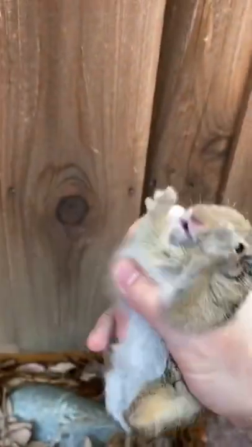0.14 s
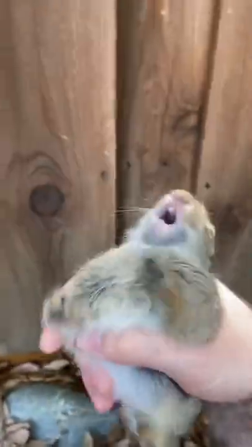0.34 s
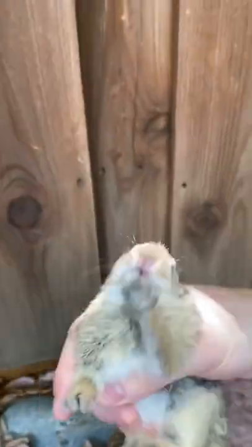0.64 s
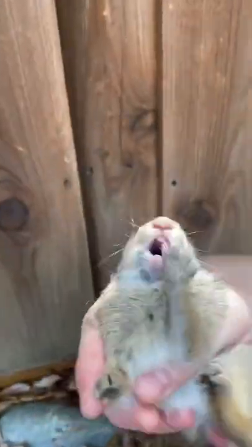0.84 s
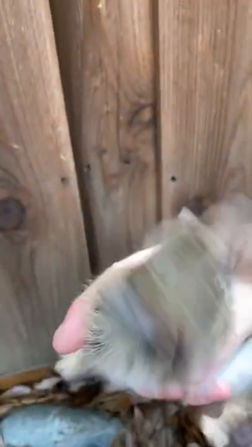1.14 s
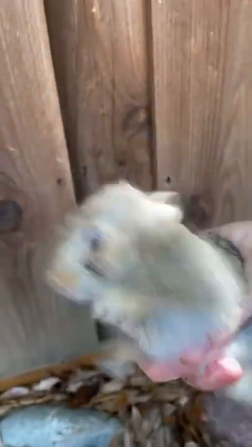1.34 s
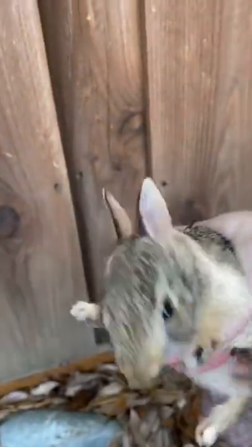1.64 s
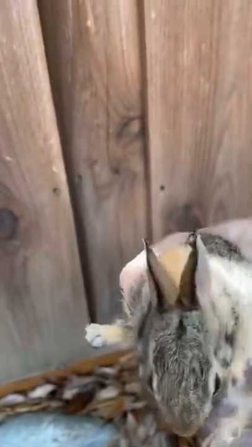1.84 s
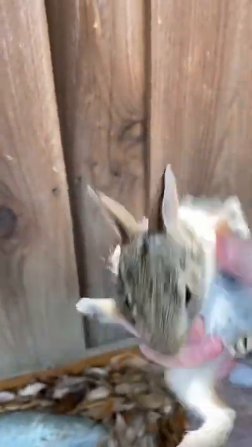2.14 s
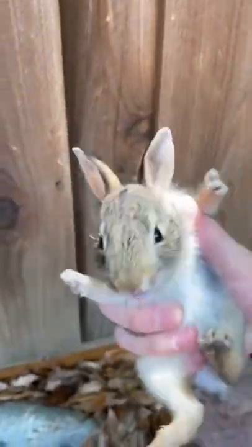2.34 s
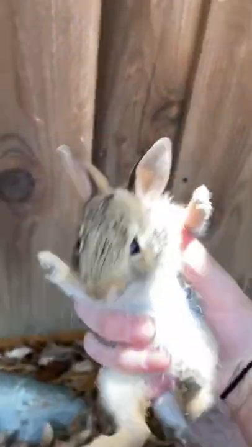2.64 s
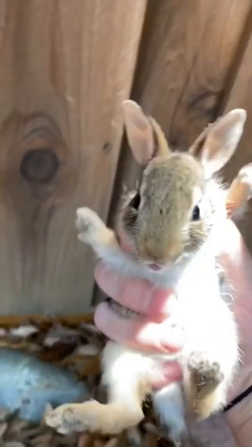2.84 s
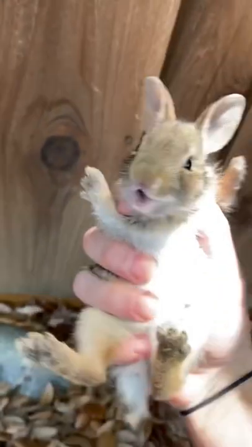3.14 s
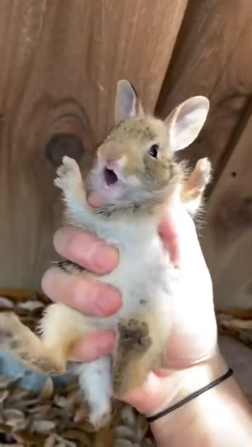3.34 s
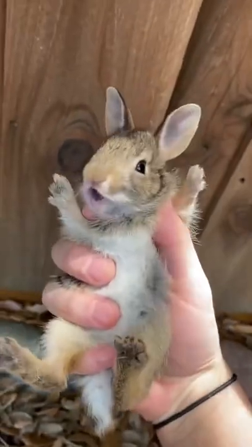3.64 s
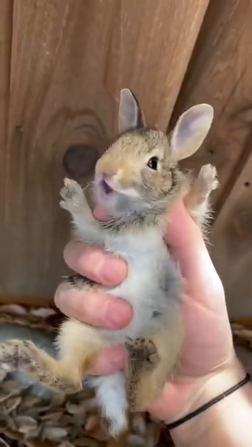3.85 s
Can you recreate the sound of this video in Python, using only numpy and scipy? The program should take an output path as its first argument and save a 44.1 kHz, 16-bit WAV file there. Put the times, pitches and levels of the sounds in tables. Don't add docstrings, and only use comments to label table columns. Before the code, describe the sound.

Piercing, raspy squeals from a small held rabbit repeat in short bursts over faint outdoor rumble.

```python
import sys
import numpy as np
from scipy import signal
from scipy.fft import rfft, irfft, next_fast_len
from scipy.io import wavfile
from scipy.ndimage import uniform_filter1d, map_coordinates

SR = 44100
rng = np.random.default_rng(int(sys.argv[2]) if len(sys.argv) > 2 else 0)


def volts(x):
    e = np.asarray(x, float) / 20
    return 10 ** e


def materialize(psi):
    bounded = np.clip(np.atleast_2d(psi).T, -1, 1)
    quanta = np.round(bounded * 32767).astype(np.int16)
    wavfile.write(sys.argv[1], SR, quanta)


N = 176400

# f/Hz, slope-free density level/dB
RUMBLE = [(15, -39), (25, -4.5), (75, 1), (127, -5.5), (189, -16), (374, -26.5), (884, -40.5), (1350, -37),
          (3000, -37.5), (3900, -75.5), (6600, -120)]
RUMBLE_DB, RUMBLE_SIDE_DB, SIDE_FULL_HZ, RUMBLE_RISE_DB_PER_S = -60, -7.5, 400, 0.2

# start t/s, length t/s, first f/Hz, last f/Hz, level/dB
COOS = [
    (0, 0.33, 412, 423, -73),
    (0.847, 0.16, 370, 370, -78),
    (3.02, 0.33, 400, 377, -72),
    (3.554, 0.16, 357, 336, -70.5),
]
COO_OCTAVE_DB = -24

# t/s, level/dB
KNOCKS = [
    (1.617, -47),
    (2.312, -46),
    (2.70, -59),
]
KNOCK_DECAY_S, RUB_TOP_HZ, THUMP_HZ = 0.0114, 251, 88.4

FENCE_S, FENCE_DB = .0035, -14
YARD_T60_S, YARD_DB, TAIL_T60_S, TAIL_DB, YARD_TOP_HZ = .06, -24, .4, -35, 5000

# t/s, f/Hz, effort level/dB, nose level/dB, mouth level/dB
STRUGGLING = [
    [(0.176, 1247, -63, 11, 16), (0.202, 1217, -34.5, -4, 6.5), (0.218, 1128, -39, -9, 5),
     (0.288, 973, -33.5, -19, -4), (0.356, 984.5, -25, -30, -1.5), (0.388, 993, -20.5, -32, -5),
     (0.416, 1033, -23, -28, -6.5), (0.454, 856.5, -28.5, -24.5, -8.5), (0.464, 788, -34, -19.5, -6.5)],
    [(0.604, 1135, -64, 9.5, 14), (0.62, 1146, -48.5, 4.5, 6), (0.654, 1127, -37, -8.5, 5),
     (0.664, 1090, -37, -8, 2), (0.69, 1020, -30, -21, 5), (0.734, 1048, -25.5, -37.5, -5),
     (0.776, 987, -24, -31.5, -9), (0.792, 879.3, -28, -22, 0), (0.806, 798, -36.5, -17, -6.5)],
    [(0.981, 1132, -67, 16.5, 8), (1.013, 1185, -52.5, 17.5, 17.5), (1.045, 1102, -33, -8, 5),
     (1.091, 995.5, -28.5, -17.5, 2), (1.119, 972.7, -31.5, -16.5, 2), (1.177, 1011, -26, -23.5, -3.5),
     (1.191, 937.4, -34, -16, -4.5), (1.211, 925, -30.5, -21, -3.5), (1.24, 809.7, -45, -7.5, -5)],
    [(1.453, 1099, -68.5, 21.5, 14), (1.483, 1035, -49.5, 12, 13), (1.513, 1061, -27, -20, 2),
     (1.525, 1057, -23.5, -24, -8), (1.555, 1076, -21, -26, -13), (1.579, 933.3, -24.5, -23, -15),
     (1.585, 916.6, -29, -23, -7), (1.597, 841, -29.5, -20.5, -15), (1.605, 823.4, -40.5, -15, -10)],
]
# t/s, f/Hz, effort level/dB, nose level/dB, mouth level/dB
ARCHED = [
    [(1.772, 983, -71, 16, 12), (1.796, 1041, -49.5, 0, 10.5), (1.83, 991.2, -29.5, -24, -0.5),
     (1.866, 1062, -26.5, -19, -11.5), (1.892, 1057, -28, -19.5, -9.5), (1.918, 982, -27, -25.5, -8),
     (1.93, 862.4, -31, -24, -11), (1.94, 833, -33, -15.5, -5)],
    [(2.14, 1013, -59.5, 11.5, 10.5), (2.152, 990, -51.5, 7, 11), (2.184, 1038, -29, -17.5, 4),
     (2.204, 1104, -26.5, -21, -7), (2.24, 1074, -22, -18.5, -7.5), (2.276, 1037, -23.5, -18.5, -10),
     (2.286, 954.2, -25, -26.5, -11.5), (2.296, 938, -28, -15.5, -8)],
    [(2.504, 999.6, -59.5, 7.5, 5), (2.518, 997, -47, 1.5, 10.5), (2.552, 1019, -23, -24, -9.5),
     (2.566, 1057, -27.5, -14.5, -3.5), (2.584, 1094, -22.5, -23, -10.5), (2.636, 1053, -24, -21, -7),
     (2.656, 992.2, -20, -29, -11), (2.684, 793, -31.5, -18, -9)],
    [(2.833, 979, -58.5, 11.5, 12), (2.871, 961, -30, -19, -1), (2.889, 985, -22.5, -27.5, -10.5),
     (2.929, 1063, -22, -29.5, -9.5), (2.955, 1032, -21, -41.5, -11), (2.979, 995, -21.5, -33, -8.5),
     (2.995, 842, -27.5, -20, -8.5), (3.004, 787, -28.5, -24.5, -10.5)],
    [(3.212, 1000, -53, 2, 8.5), (3.25, 998, -29, -22, 1), (3.28, 1069, -23, -29.5, -9),
     (3.3, 1095, -23, -25, -11), (3.364, 1036, -22.5, -31.5, -8.5), (3.382, 945, -25.5, -38, -9),
     (3.39, 848, -27, -25, -5), (3.398, 822, -28.5, -22.5, -3.5)],
    [(3.545, 940, -56, 7.5, 4), (3.595, 942, -27, -22, -8.5), (3.629, 1016, -21.5, -34.5, -11),
     (3.665, 1014, -22, -35, -10), (3.693, 985, -22.5, -33, -8), (3.703, 945, -28, -28, -10),
     (3.713, 829, -28.5, -25, -3.5), (3.724, 820, -32.5, -18, -8.5)],]
# t/s, f/Hz, effort level/dB, nose level/dB, mouth level/dB
EDGES = [
    [(0.0, 945.6, -32.5, -16.5, -3), (0.012, 911.4, -29.5, -14.5, -3), (0.035, 910.6, -45.5, -5, -2)],
    [(3.878, 924.4, -56.5, 8.5, 6.5), (3.922, 941.3, -28.5, -20, -7), (3.96, 1007, -24, -29.5, -9.5),
     (4.0, 1023, -23.5, -29, -7.5)],
]
PAN_DB = [-.3, -1, -1.4, -1.1, -0.0067, -0.053, 0.86, 0.35, 0.76, -0.12, 0.44, 0.41]
LAG_SAMPLES = [.1, -0.13, 0.15, -.1, 0.2, 0.081, 0.067, .1, -0.015, 0.093, -.05, .05]
LAG_SWAY = .2
HOARSE = [.1, .03, .12, 0, .05, .2, .15, .28, .2, .28, .2, .15]

ATTACK_S, RELEASE_S, CLOSE_DB_PER_S = .011, 0.022, 900
SCOOP_OCT_PER_S, SAG_OCT_PER_S = 11, 15
JITTER, JITTER_PER_GLIDE, RASP_JITTER = .002, .001, .035
FLUTTER_DB, QUICK_FLUTTER = 2.8, .5
HALF_DB = -33
RASP_BELOW_HZ, RASP_SPAN_HZ, RASP_DB = 965, 100, 25
BREATH_DB, BREATH_PER_GLIDE_DB, BREATH_GATE, PATCHY_DB = -38, 2.5, .5, 4
SLACK_BELOW_DB, BREATH_PER_SLACK = -9, 1.2
MOUTH_BREATH_DB, MOST_BREATH_DB, MOST_MOUTH_BREATH_DB = 15, -9, -3
NOSE_BREATH, CHEST_BREATH = .22, .02
CHEST_FOLLOWS, EFFORT_REF_DB = 0.62, -12

# f/Hz, level/dB
CHEST = [(500, -40.5), (800, -27), (1100, -25), (1600, -44)]
# f/Hz, level/dB
NOSE = [(1300, -13.5), (2000, -2.5), (2400, -2), (3100, 2.5), (3700, 1.5), (4500, -50.5)]
# f/Hz, level/dB
THROAT = [(3000, -44.5), (3500, -13.5), (4200, -5), (5100, 2.5), (6000, -4), (7000, -1.5), (8000, -19),
          (9500, -46.5)]
# f/Hz, level/dB
MOUTH = [(6000, -47.5), (8000, 0.5), (9200, -3), (10500, -7.5), (12500, -5), (14000, -7), (15500, -9.5),
         (17000, -35.5)]
# f/Hz, phase/rad
PORTS = [(1000, .4), (2500, 1.05), (4000, .5), (5600, .6), (6600, 2.9), (7800, 3.3), (8700, 5.2),
         (10500, 6.3), (13150, 9.3), (14600, 9.55), (15700, 12.2)]


def colour(x, points):
    n = next_fast_len(x.shape[-1] + 4096)
    hz, db = np.array(points, float).T
    f = np.maximum(np.arange(4097) * SR / 8192, 1)
    cepstrum = irfft(np.interp(np.log(f), np.log(hz), db) * np.log(10) / 20)
    cepstrum[1:4096] *= 2
    cepstrum[4097:] = 0
    impulse = irfft(np.exp(rfft(cepstrum)))[:4096]
    return irfft(rfft(x, n) * rfft(impulse, n), n)[..., :x.shape[-1]]


def unit(x):
    return x / np.sqrt(np.mean(x ** 2))


def walk(rate):
    k = max(int(SR / rate), 1)
    return unit(uniform_filter1d(uniform_filter1d(rng.standard_normal(N), k), k))


def rumble():
    shape = list(RUMBLE) + [(8000, -66.5), (16000, -67.0)]
    mid, side = colour(rng.standard_normal((2, N)), shape)
    side = volts(RUMBLE_SIDE_DB) * signal.lfilter(*signal.butter(1, SIDE_FULL_HZ, "high", fs=SR), side)
    rise_db = RUMBLE_RISE_DB_PER_S * (np.arange(N) - N / 2) / SR
    level = volts(RUMBLE_DB + rise_db + 1.0 * walk(3.9))
    traffic = np.array([mid + side, mid - side]) * level / np.std(mid)
    return signal.lfilter(*signal.butter(3, 45, "high", fs=SR), traffic)


def dove(t):
    out, wobble = 0, 0.023 * walk(7.0)
    for start, length, hz, end_hz, db in COOS:
        u = np.clip((t - start) / length, 0, 1)
        phase = 2 * np.pi * np.cumsum((hz + (end_hz - hz) * u) * (1 + wobble)) / SR
        tone = np.sin(phase) + volts(COO_OCTAVE_DB) * np.sin(2 * phase)
        out = out + volts(db + 2.5) * np.sqrt(abs(np.sin(np.pi * u))) * tone
    return out * volts(4.5 * walk(35) - 1.5)


def knocks(t):
    dull = signal.lfilter(*signal.butter(2, RUB_TOP_HZ, fs=SR), rng.standard_normal(N))
    rub = 0.39 * unit(dull)
    out = 0
    for start, db in KNOCKS:
        age = np.maximum(t - start, 0)
        swing = 2 * np.sin(2 * np.pi * THUMP_HZ * age)
        out = out + volts(db) * (age > 0) * np.exp(-age / KNOCK_DECAY_S) * (swing + rub)
    return out


def yard(x):
    t = np.arange(SR // 2) / SR

    def fade(t60, db):
        return volts(db - 60 * t / t60) / np.sqrt(t60 * SR / 14)

    decay = fade(YARD_T60_S, YARD_DB) + fade(TAIL_T60_S, TAIL_DB)
    echoes = rng.standard_normal((2, len(t))) * decay * (t > FENCE_S)
    dull = signal.lfilter(*signal.butter(1, YARD_TOP_HZ, fs=SR), x)
    return signal.fftconvolve(dull[None], echoes, axes=1)[:, :N]


def squeal_contours(t):
    calls = EDGES[:1] + STRUGGLING + ARCHED + EDGES[1:]
    starts = [call[0][0] - 3 * ATTACK_S for call in calls]
    which = np.maximum(np.searchsorted(starts, t) - 1, 0)
    hz, effort, on, nose, mouth = np.zeros((5, N))
    for i, call in enumerate(calls):
        s, pitch, db, nose_db, mouth_db = np.array(call, float).T
        now = which == i
        u = t[now]
        early, late = np.maximum(s[0] - u, 0), np.maximum(u - s[-1], 0)
        slide = np.minimum(SCOOP_OCT_PER_S * early + SAG_OCT_PER_S * late, .5)
        hz[now] = np.interp(u, s, pitch) * 2 ** -slide
        effort[now] = np.interp(u, s, db) - CLOSE_DB_PER_S * np.minimum(late, .04) - EFFORT_REF_DB
        nose[now], mouth[now] = np.interp(u, s, nose_db), np.interp(u, s, mouth_db)
        on[now] = np.clip(1 - early / ATTACK_S, 0, 1) * np.exp(-3 * late / RELEASE_S) * volts(EFFORT_REF_DB)
    hz = uniform_filter1d(uniform_filter1d(hz, size=600), size=600)
    return which, hz, uniform_filter1d(effort, size=400), on, nose, mouth


def fold_pulses(phase, hz, on):
    pulses = 0
    for k in range(1, 24):
        flutter = volts(FLUTTER_DB * (walk(16.0) + QUICK_FLUTTER * walk(90)))
        pulses = pulses + np.cos(k * phase) * flutter * (k * hz < .45 * SR)
    return pulses * (1 + volts(HALF_DB + 1.5 * walk(6.8)) * np.cos(phase / 2)) * on


def breath(phase, glide, rasp, effort, on):
    gate = np.exp((np.cos(phase) - 1) / BREATH_GATE)
    slack = np.clip(SLACK_BELOW_DB - effort, 0, 20)
    rough_db = BREATH_DB + BREATH_PER_GLIDE_DB * glide + BREATH_PER_SLACK * slack
    rough_db = rough_db + RASP_DB * rasp + PATCHY_DB * walk(25)
    air = unit(gate * rng.standard_normal(N)) * np.sqrt(10) * on
    mouth_air = air * volts(np.minimum(rough_db + MOUTH_BREATH_DB, MOST_MOUTH_BREATH_DB))
    return air * volts(np.minimum(rough_db, MOST_BREATH_DB)), mouth_air


def rabbit(t):
    which, hz, effort, on, nose, mouth = squeal_contours(t)
    glide = np.minimum(abs(np.gradient(np.log2(hz))) * SR, 4)
    rasp = np.clip((RASP_BELOW_HZ - hz) / RASP_SPAN_HZ, 0, 1)
    rasp = rasp + np.array(HOARSE)[which] * np.clip(1 + .6 * walk(20), 0, 2)
    jitter = (JITTER + JITTER_PER_GLIDE * glide + RASP_JITTER * rasp ** 2) * walk(400)
    phase = 2 * np.pi * np.cumsum(hz * (1 + jitter)) / SR
    pulses = fold_pulses(phase, hz, on)
    air, mouth_air = breath(phase, glide, rasp, effort, on)
    chest = colour((pulses + CHEST_BREATH * air) * volts(CHEST_FOLLOWS * effort), CHEST)
    nasal = colour((pulses + NOSE_BREATH * (1 + 4 * rasp) * air) * volts(effort + nose), NOSE)
    throat = colour((pulses + air) * volts(effort), THROAT)
    oral = colour((pulses + mouth_air) * volts(effort + mouth + 1.0 + 2.1 * walk(47)), MOUTH)
    pan = np.array(PAN_DB)[which]
    lag = uniform_filter1d(np.array(LAG_SAMPLES)[which], size=2000) + LAG_SWAY * walk(18)
    return chest + nasal + throat + oral, pan, lag


def microphone_ports(near, pan, lag, t):
    f = np.arange(N // 2 + 1) * SR / N
    half_lead = np.exp(.5j * np.interp(f, *np.array(PORTS).T))
    spectrum = rfft(near)
    left = irfft(spectrum * half_lead, N) * volts(pan / 2)
    right = irfft(spectrum / half_lead, N) / volts(pan / 2)
    left = map_coordinates(left, [t * SR - .5 * lag], mode="nearest")
    right = map_coordinates(right, [t * SR + .5 * lag], mode="nearest")
    return np.array([left, right])


def scene():
    t = np.arange(N) / SR
    background = rumble() + dove(t) + knocks(t)
    voice, pan, lag = rabbit(t)
    near = voice + volts(FENCE_DB) * np.interp(t - FENCE_S, t, voice)
    return microphone_ports(near, pan, lag, t) + yard(voice) + background


def roll_off(x):
    return signal.sosfilt(signal.butter(12, 15970, fs=SR, output="sos"), x)


def record(dry):
    cut = signal.sosfilt(signal.ellip(10, .2, 100, 15800, fs=SR, output="sos"), dry)
    return roll_off(cut)


dry = scene()
out = record(dry)
materialize(out)
```